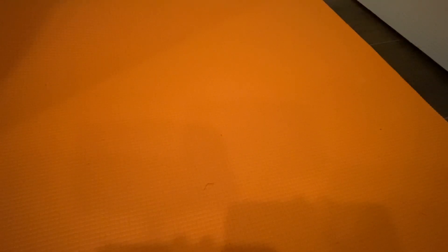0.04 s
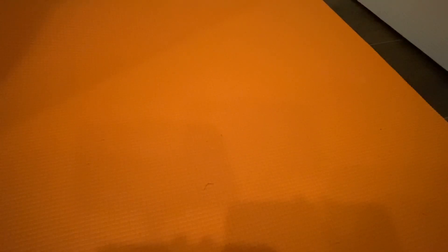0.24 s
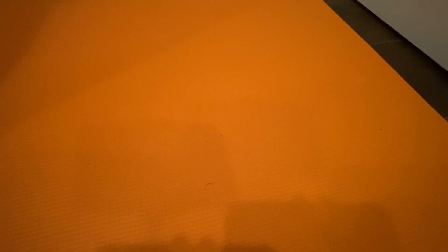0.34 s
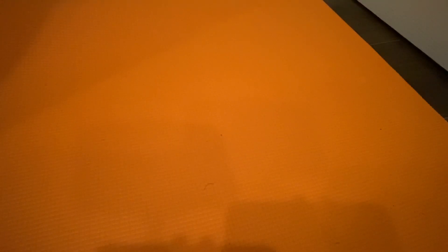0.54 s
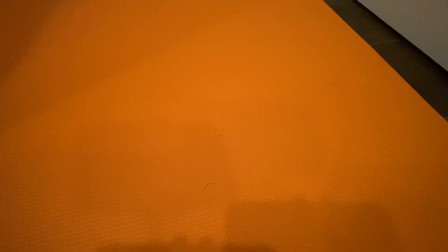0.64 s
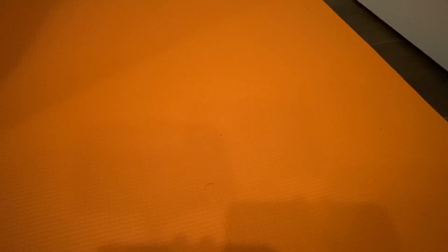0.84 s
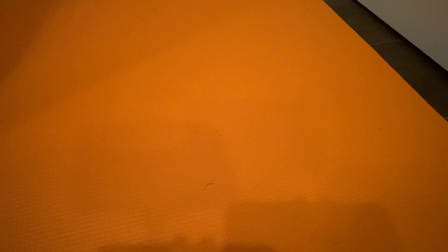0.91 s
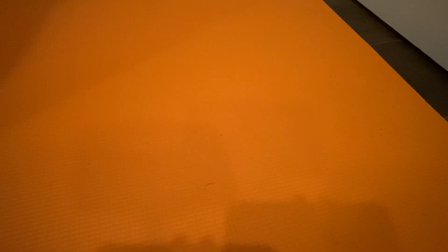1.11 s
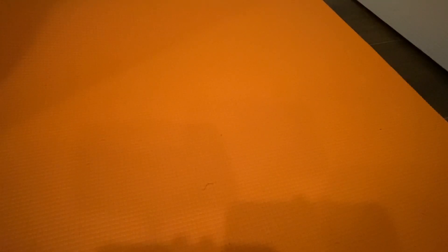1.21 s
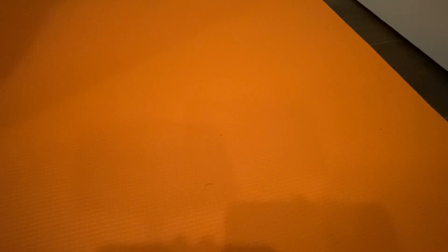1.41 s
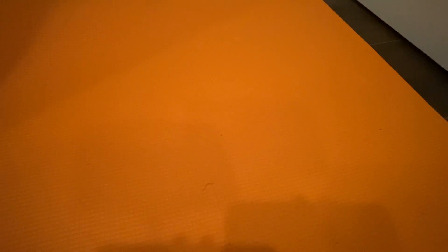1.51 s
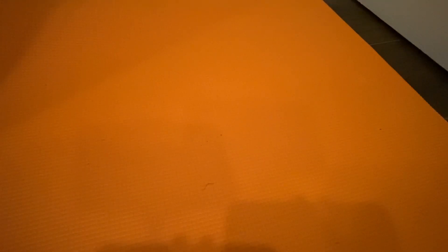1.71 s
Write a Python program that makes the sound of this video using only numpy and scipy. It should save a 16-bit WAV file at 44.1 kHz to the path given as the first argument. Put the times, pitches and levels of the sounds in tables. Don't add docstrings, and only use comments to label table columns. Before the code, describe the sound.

Tight parcel film cracks in bright, dry, irregular bursts, with a carton knock and low surface thud first, a short blade scrape, sharp snaps later, then faint rustles; close stereo pickup indoors over soft rumble.

```python
import sys
import numpy as np
from scipy import signal
from scipy.fft import rfft, irfft
from scipy.io import wavfile
from scipy.ndimage import uniform_filter1d

SR = 44100
rng = np.random.default_rng(int(sys.argv[2]) if len(sys.argv) > 2 else 0)


def ratio(d):
    e = np.asarray(d, float) / 20
    return 10 ** e


def wav_out(sig):
    wavfile.write(sys.argv[1], SR, np.round(np.clip(np.atleast_2d(sig).T, -1, 1) * 32767).astype(np.int16))


N = 77175


def evened(x):
    return x / np.sqrt(np.mean(x ** 2) + 1e-20)


def read(points, hz):
    f, value = np.transpose(points)
    return np.interp(np.log(hz + 1), np.log(f + 1), value)


def colour(x, points):
    hz = abs(np.fft.fftfreq(4096, 1 / SR))
    below = (points[0][0] / 2, points[0][1] - 40)
    above = (points[-1][0] * 1.5, points[-1][1] - 40)
    log_gain = np.log(ratio(read([below] + list(points) + [above], hz)))
    taps = np.fft.ifft(np.exp(np.conj(signal.hilbert(log_gain)))).real[:2048]
    return signal.oaconvolve(x, taps / np.linalg.norm(taps))[:len(x)]


def resonate(x, hz, width_hz):
    r = np.exp(-np.pi * width_hz / SR)
    ring = signal.lfilter([1, 0, -r], [1, -2 * r * np.cos(2 * np.pi * hz / SR), r * r], x)
    return ring * np.sqrt((1 - r * r) / 2)


def ringing(x, hz, width_hz):
    y = resonate(resonate(x, hz, 3 * width_hz), hz, width_hz)
    return y * np.linalg.norm(x) / np.linalg.norm(y)


def add(mix, s, sound):
    part = mix[round(s * SR):][:len(sound)]
    part += sound[:len(part)]


def curve(table, column):
    rows = np.array(table)
    return ratio(np.interp(np.arange(N) / SR, rows[:, 0], rows[:, column]))


def unsteady(smooth):
    noise = rng.standard_normal(N)
    return evened(uniform_filter1d(uniform_filter1d(noise, size=smooth), size=smooth))


def grit(size, per_s, spread_db):
    chance, scale, sign = rng.random((size, 3)).T
    slip_size = ratio(-spread_db * np.log(scale + 0.0072))
    return evened((chance < per_s / SR) * slip_size * (sign - .5))


def burst(length_s, rise_s):
    t = np.arange(3000) / SR
    shape = np.minimum(t / rise_s, 1) * np.exp(-t / max(length_s, .001))
    x = grit(size=len(t), per_s=12000, spread_db=3) * shape
    return x * np.sqrt(np.sum(shape ** 2) / np.sum(x ** 2))


CRACK_RISE_S = 0.001
# start_s, level_db, pitch_hz, treble_db, length_s
FILM_SNAPS = [(0.2358, -33, 4480, -11.5, 0.0043), (0.259, -41, 4530, -6, 0.0059),
              (0.2645, -31.5, 2360, -10, 0.0026), (0.2892, -28.5, 2250, -5, 0.0044),
              (0.5715, -39.5, 4570, -20, 0.0059), (0.581, -31, 4500, -23, 0.0023),
              (0.6099, -32.5, 4460, -17, 0.004), (0.6683, -36.5, 4640, -13, 0.002),
              (0.6834, -35, 3680, -14, 0.0042), (0.7728, -25, 4400, -5, 0.004),
              (0.7805, -44, 4850, -16, 0.0054), (0.8015, -39.5, 4640, -9.5, 0.0058),
              (0.8679, -43, 4660, 8, 0.0034), (0.8791, -43.5, 4670, 3.5, 0.0044),
              (0.9119, -39.5, 4420, -14, 0.0029), (1.3545, -44.5, 5640, -20, 0.0099),
              (1.3618, -26.5, 4150, -8, 0.0024), (1.3648, -33, 4700, -0.5, 0.0036),
              (1.3675, -25, 4540, -13, 0.0035), (1.706, -45, 4900, -3, 0.0024),
              (1.7434, -47, 2800, -10, 0.0058)]
# start_s, level_db, pitch_hz, treble_db
FILM_TICKS = [(0.1262, -60.5, 2200, -3), (0.1774, -59.5, 2080, -12), (0.203, -62, 2280, -12),
              (0.3, -43, 2210, -8), (0.3392, -39.5, 4500, -28), (0.7, -61, 3600, -28),
              (0.7136, -40.5, 3770, -26), (0.736, -47.5, 3640, -19), (0.7946, -41, 4440, -37),
              (0.8372, -46.5, 4840, -7.5), (0.9945, -47.5, 3470, -10), (1.0105, -53.5, 3360, -0.5),
              (1.0989, -49.5, 4470, -12), (1.1864, -60, 3740, -24), (1.2405, -65, 3500, 0),
              (1.2524, -59.5, 4370, 11), (1.4132, -46.5, 4740, -25), (1.5862, -54, 5070, -2),
              (1.6, -47, 3271, -15), (1.65, -56.5, 2140, -16), (1.693, -64, 5330, 2)]
# pitch_hz, level_db
FILM_TONE = [(900, -25), (1900, -11.5), (2700, -9), (3500, -1.5), (4600, -5), (5500, -4.5), (7800, -5.5),
             (9200, -2.5)]
# pitch_hz, level_db
SHEEN_TONE = [(7500, -39.5), (9000, -1), (11500, 7), (14000, 0.5), (16000, 1), (17000, 1.5)]


def film():
    out = np.zeros(N)
    tick_s, ring_db, ring_width_hz = 0.0049, -5, 600
    ticks = [(*row, tick_s) for row in FILM_TICKS]
    for s, db, hz, treble_db, length_s in list(FILM_SNAPS) + ticks:
        x = burst(length_s, CRACK_RISE_S)
        body = colour(x, FILM_TONE) + ratio(ring_db) * ringing(x, hz, ring_width_hz)
        sheen = ratio(treble_db + 2.5) * colour(x, SHEEN_TONE)
        add(out, s, ratio(db - 6) * (body + sheen))
    return out


# start_s, rustle_db (film), drag_db (carton)
HANDS = [(0, -76, -72.5), (.11, -84.5, -92), (.135, -67.5, -70.5), (.23, -73.5, -64), (.26, -42, -51),
         (.33, -60, -54), (.5, -56, -59), (.62, -62, -64.5), (.76, -59, -64), (.82, -88, -76),
         (.93, -70, -80), (1.02, -66, -64.5), (1.13, -73, -74.5), (1.32, -74.5, -77), (1.38, -56, -68.5),
         (1.47, -62.5, -70), (1.6, -71.5, -78.5), (1.75, -77.5, -69.5)]
# pitch_hz, level_db
RUSTLE_TONE = [(900, 7), (2000, 4), (2800, -0.5), (4500, 3), (7500, -2), (11500, -3.5), (16000, -6)]


def rustle():
    crackle = colour(grit(size=N, per_s=6000, spread_db=1.0), RUSTLE_TONE)
    return curve(HANDS, column=1) * ratio(2.0 * unsteady(300)) * crackle


# start_s, pressure_db
STROKE = [
    (.3, -75),
    (.36, -62),
    (.41, -56.5),
    (.45, -54.5),
    (.5, -60),
    (.54, -62.5),
    (.62, -88),
]
# pitch_hz, width_hz, level_db
BLADE_RINGS = [(3300, 190, -14), (4910, 640, -0.5), (5340, 250, -5), (5890, 670, 2.5), (7020, 810, -11)]


def blade():
    t = np.arange(N) / SR
    touch = np.clip(np.minimum(t - STROKE[0][0], STROKE[-1][0] - t) / 0.025, 0, 1)
    slips = grit(size=N, per_s=16000, spread_db=-4.0) * curve(STROKE, column=1) * touch
    out = np.zeros(N)
    for hz, width_hz, db in BLADE_RINGS:
        out += ratio(db) * resonate(resonate(slips, hz, width_hz * 2), hz, width_hz) / 3
    return ratio(3.0) * out


# start_s, level_db, pitch_hz, length_s, ring_db
KNOCKS = [(0.1743, -48, 1000, 0.0043, -7), (.2555, -31.5, 740, 0.0065, -4), (.2605, -29, 670, 0.0043, -1),
          (.2665, -25.5, 663, 0.005, -1), (.278, -43, 1480, 0.0031, -14), (.290, -30.5, 660, 0.0089, -8.5),
          (.300, -27, 674, 0.0036, -3), (0.374, -43.5, 434, 0.0091, 9), (.410, -39, 346, 0.0035, 7.5),
          (.43, -46, 422, 0.043, -3), (0.962, -51.5, 474, 0.0055, 2), (1.328, -53, 780, 0.0063, -6),
          (1.413, -38.5, 888, 0.0046, 2.5), (1.587, -52.5, 930, 0.0048, -6)]
# pitch_hz, level_db
CARTON_TONE = [(120, -9.5), (300, -6), (657, -11), (1000, -5.5), (1500, -12.5), (4000, -22.5)]
# pitch_hz, level_db
DRAG_TONE = [(88, -33.5), (150, 0.5), (425, -6), (642, -4), (3000, -19), (3900, -80), (6600, -120)]


def carton():
    drag = colour(grit(size=N, per_s=3200, spread_db=2.0), DRAG_TONE)
    out = curve(HANDS, column=2) * ratio(2.0 * unsteady(400)) * drag
    for s, db, hz, length_s, ring_db in KNOCKS:
        x = burst(length_s, rise_s=0.00084)
        ring = ratio(ring_db) * ringing(x, hz, width_hz=140)
        add(out, s, ratio(db - 6.5) * (colour(x, CARTON_TONE) + ring))
    return out


# start_s, level_db, pitch_hz, width_hz, length_s
PINGS = [(.5722, -42, 7800, 900, 0.0012), (.576, -50, 4570, 500, 0.0017), (0.5808, -46, 7800, 900, .0015),
         (.5845, -42, 4460, 500, 0.0027), (.6098, -38, 8000, 1000, 0.0012),
         (.7728, -29.5, 7840, 1200, 0.0024), (.776, -35, 6500, 900, .003), (0.785, -37, 11200, 900, .0015),
         (.9592, -40.5, 930, 437, 0.00057), (.9635, -47, 458, 90, 0.0066), (.2385, -48, 4390, 500, .003),
         (.262, -30.5, 1170, 504, 0.0042), (.40, -48, 430, 120, 0.031), (.47, -52, 430, 90, 0.026),
         (.69, -51.5, 770, 500, 0.013), (.73, -61.5, 696, 297, 0.036), (1.2, -67.5, 980, 503, 0.0069),
         (1.085, -62, 760, 500, 0.0085), (1.3606, -36, 3090, 300, 0.0049), (1.364, -35, 2180, 250, 0.0028),
         (1.361, -34, 6020, 500, 0.0057), (1.363, -46, 1190, 600, 0.0057),
         (1.4135, -43.5, 1590, 890, 0.0045), (.301, -25.5, 930, 120, 0.0021),
         (.3415, -43, 4600, 400, 0.0035)]


def pings():
    out = np.zeros(N)
    for s, db, hz, width_hz, length_s in PINGS:
        add(out, s, ratio(db) * ringing(burst(length_s, CRACK_RISE_S), hz, width_hz))
    return out


# start_s, pitch_hz, level_db, fade_s (time to fall 60 dB)
THUMPS = [
    (.26, 183, -35, 0.16),
    (.26, 94, -36, 0.18),
    (1.413, 199, -51, 0.087),
    (1.4135, 930, -42.5, 0.077),
    (.264, 650, -36.5, .08),
]


def thump():
    out = np.zeros(N)
    t = np.arange(SR // 2) / SR
    for s, hz, db, fade_s in THUMPS:
        fade = ratio(db - 60 * t / fade_s) * np.minimum(t / 0.0034, 1)
        add(out, s, fade * np.sin(2 * np.pi * hz * t))
    return out


# pitch_hz, level_db
MURMUR_TONE = [(150, -2), (250, 16.5), (468, -17.5), (528, -17.5), (922, 14.5), (2200, -43), (16000, -68)]


def parcel():
    tail_db, tail_fade_s, tail_dull, box_dryness, murmur_db = -8, 0.18, 0.46, 0.45, -81
    t = np.arange(8192) / SR
    late = rng.standard_normal(len(t)) * ratio(-60 * t / tail_fade_s) * np.minimum(t / 0.0037, 1)
    late = signal.lfilter([1], [1, -tail_dull], late)
    box = carton() + pings()
    x = film() + box + blade() + rustle()
    wet = signal.oaconvolve(x - box_dryness * box, late / np.linalg.norm(late))[:N]
    return x + ratio(tail_db) * wet + ratio(murmur_db) * colour(rng.standard_normal(N), MURMUR_TONE)


# pitch_hz, likeness (0 to 1)
LIKENESS = [(100, 0.26), (300, 0.77), (600, 0.82), (1500, 0.11), (8200, 0.25)]
# pitch_hz, level_db
LEFT_OVER_RIGHT = [(100, 14.5), (300, -1), (600, 7), (1500, 3.5), (7000, 3.5)]


def ports(x, other):
    split_hz, treble_lead_s, bass_lag_s = 7600, 0.0002544, 0.000439
    treble_turn, treble_same = -2.04, .8
    hz = np.fft.rfftfreq(2 * N, 1 / SR)
    high = 1 / (1 + (split_hz / (hz + 1)) ** 16)
    turn = -2j * np.pi * hz
    same = np.clip(read(LIKENESS, hz) * (1 - high) + treble_same * high, 0, 1)
    x, other = rfft(x, 2 * N), rfft(other, 2 * N)
    left = x * np.exp(turn * treble_lead_s)
    bass_shift = np.sqrt(1 - high) * np.exp(turn * (bass_lag_s + treble_lead_s))
    treble_shift = np.sqrt(high) * np.exp(1j * treble_turn)
    right = same * (bass_shift - treble_shift) * x + np.sqrt(1 - same ** 2) * other
    balance_db = np.array([[.5], [-.5]]) * read(LEFT_OVER_RIGHT, hz) * (1 - high)
    return irfft(np.array([left, right]) * ratio(balance_db))[:, :N]


# pitch_hz, level_db
RUMBLE_TONE = [(11, -30), (18, -11.5), (80, -2), (110, -6.5), (151, -18), (246, -36), (330, -31.5),
               (430, -92.5), (730, -120)]
RUMBLE_DB = -53.5


def background():
    a, b = rng.standard_normal((N + 4000, 2)).T
    same = 0.93
    right = same * a + np.sqrt(1 - same ** 2) * b
    low = np.array([colour(v, RUMBLE_TONE)[-N:] for v in (a, right)])
    return ratio(RUMBLE_DB) * evened(low) * np.minimum(np.arange(N) / 400, 1)


def scene():
    return ratio(1.5) * ports(parcel(), parcel()) + background() + thump()


def roll_off(x):
    return signal.sosfilt(signal.butter(12, 16990, fs=SR, output="sos"), x)


def record(dry):
    edge_hz, edge_db = 15750, -26
    hz = np.linspace(0, SR / 2, 1025)
    edge = ratio(edge_db * np.clip((hz - edge_hz) / 200, 0, 1) - 60 * (hz > 16800))
    taps = signal.firwin2(601, hz, edge, fs=SR)
    mix = signal.oaconvolve(dry, taps[None], "same")
    return roll_off(mix)


dry = scene()
out = record(dry)
wav_out(out)
```